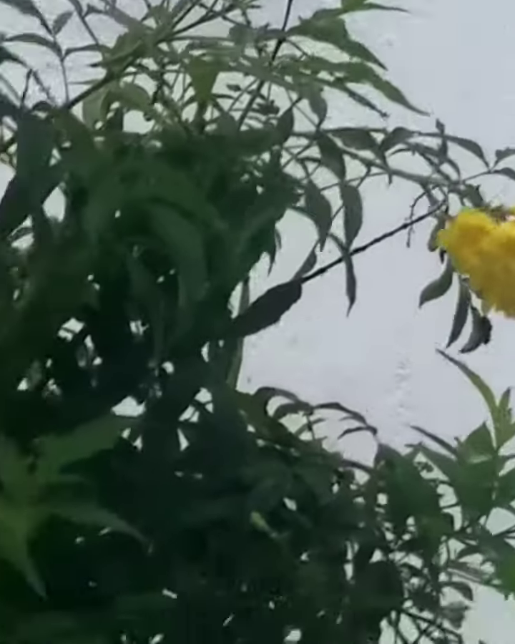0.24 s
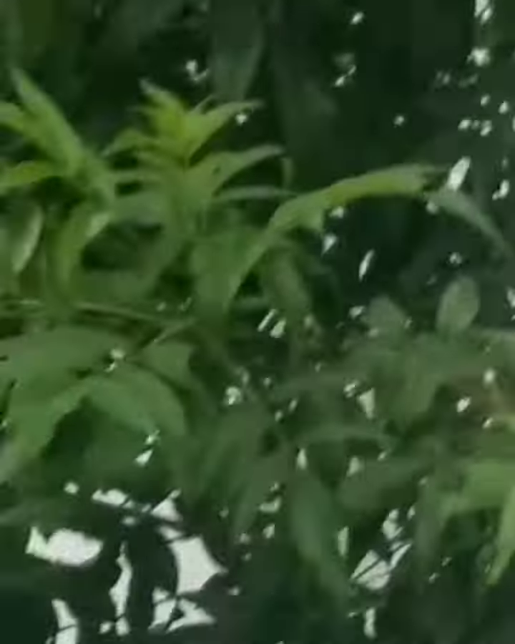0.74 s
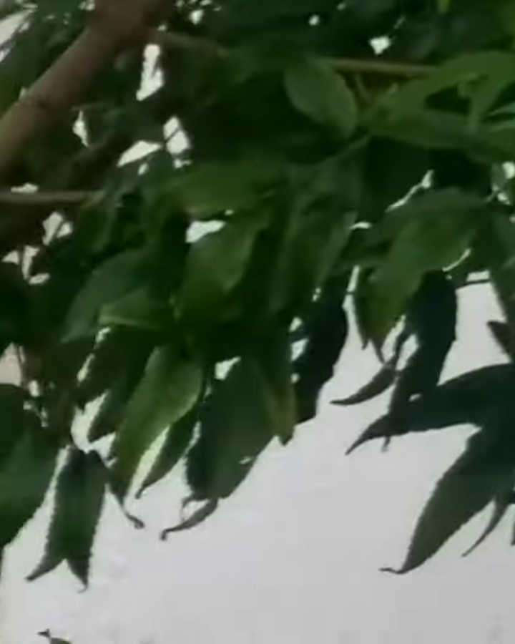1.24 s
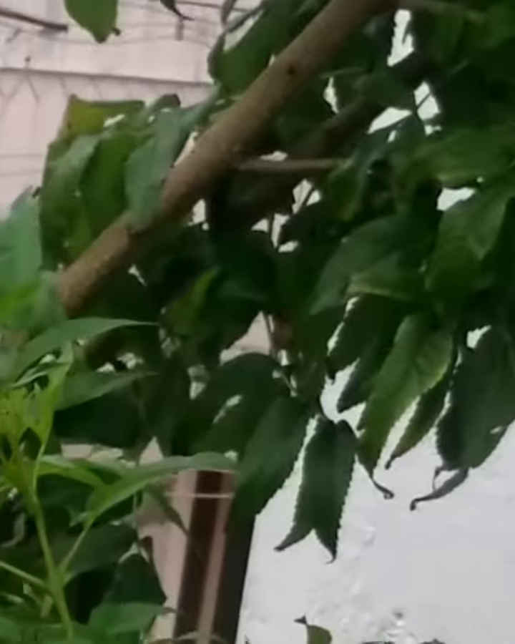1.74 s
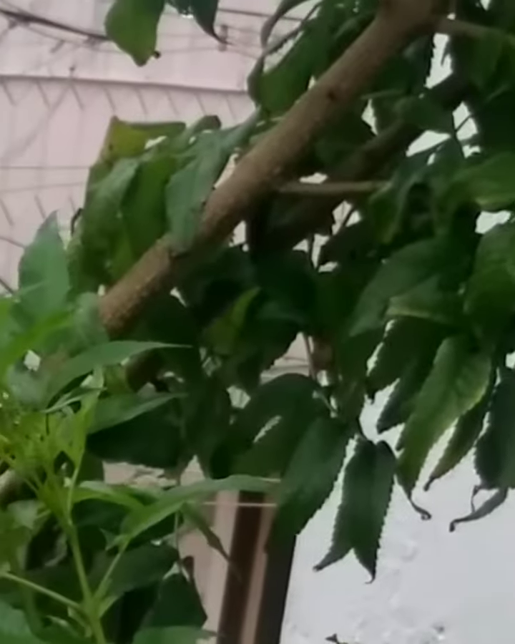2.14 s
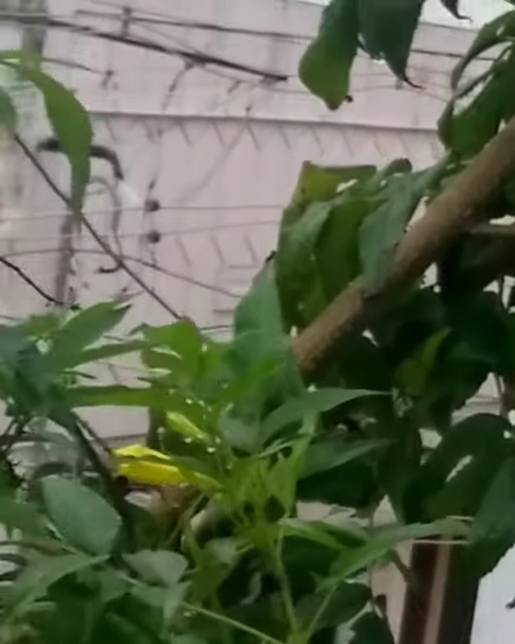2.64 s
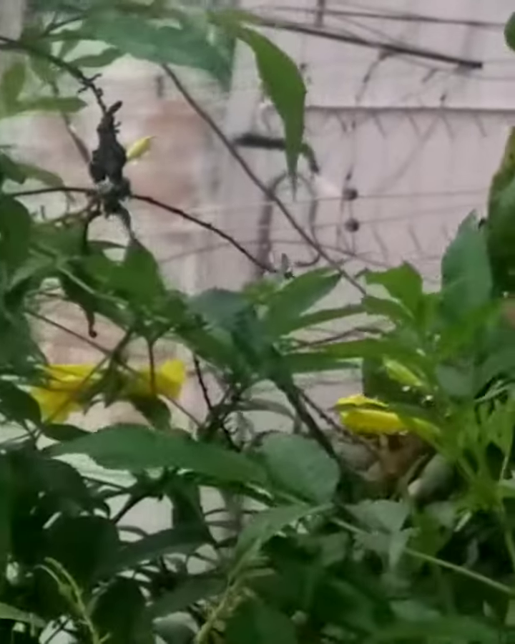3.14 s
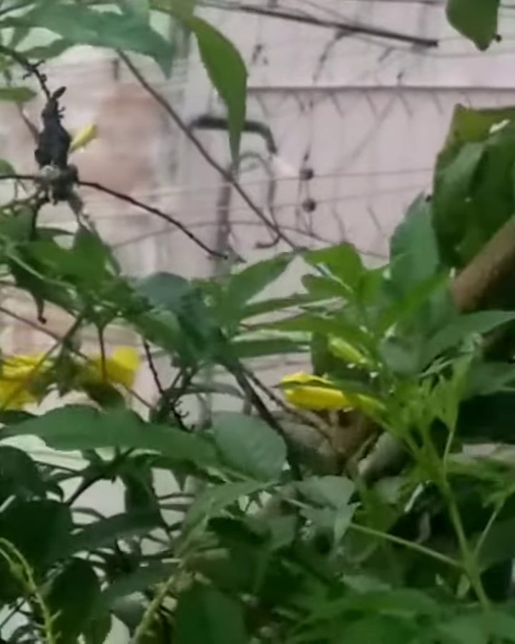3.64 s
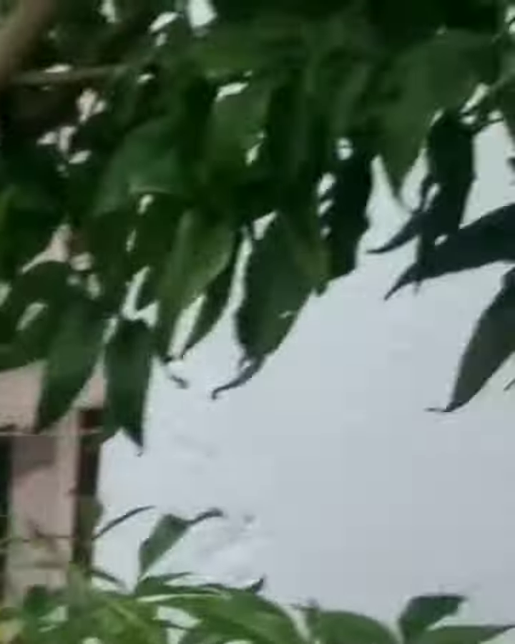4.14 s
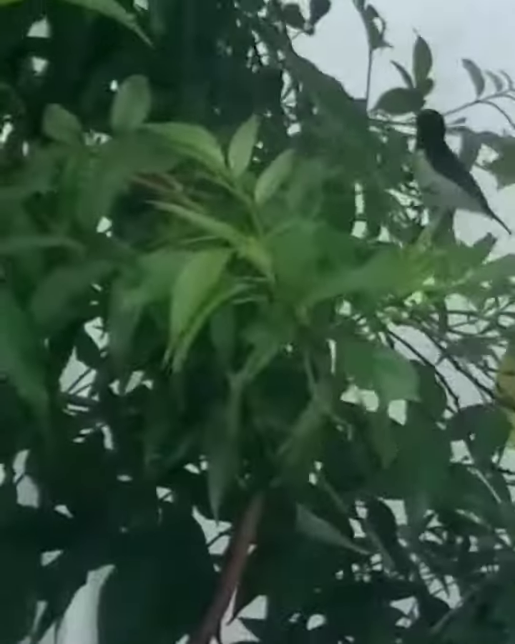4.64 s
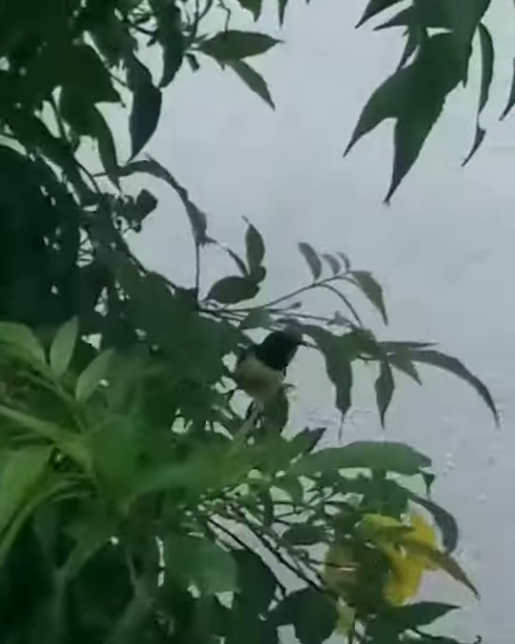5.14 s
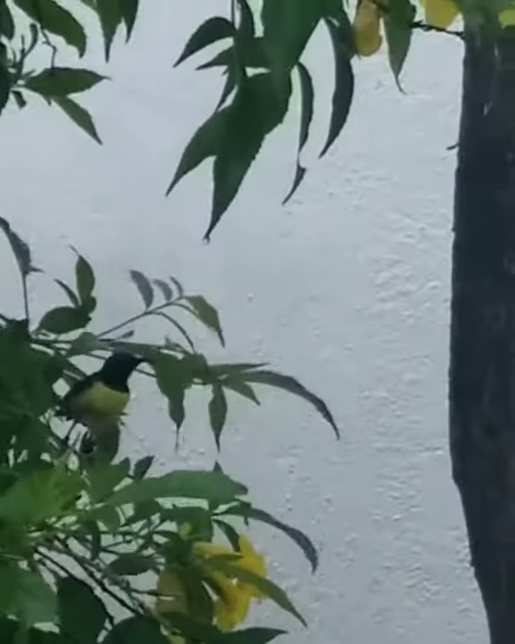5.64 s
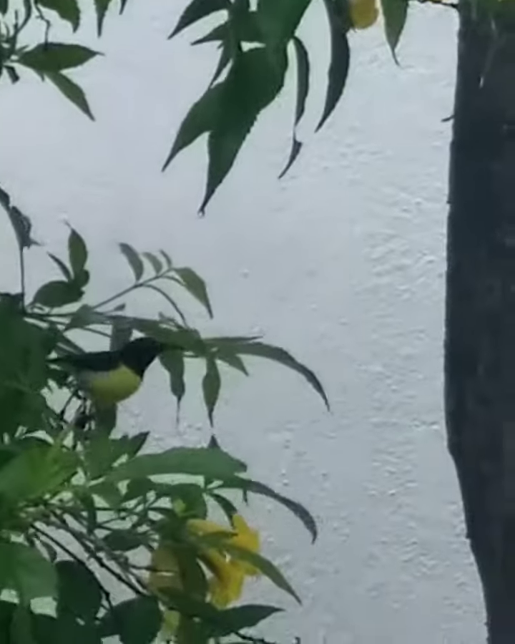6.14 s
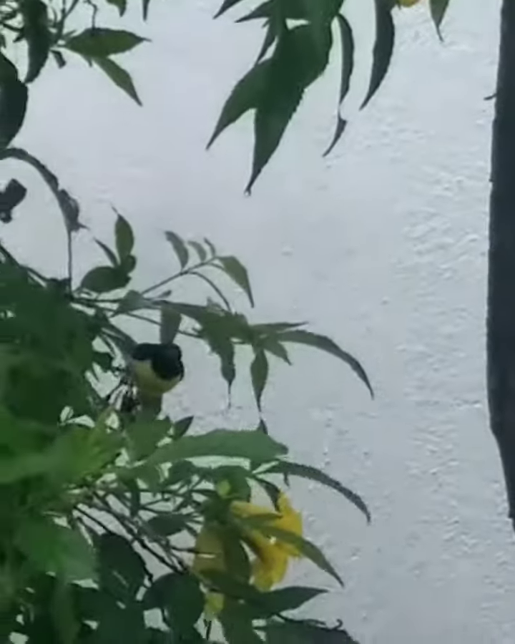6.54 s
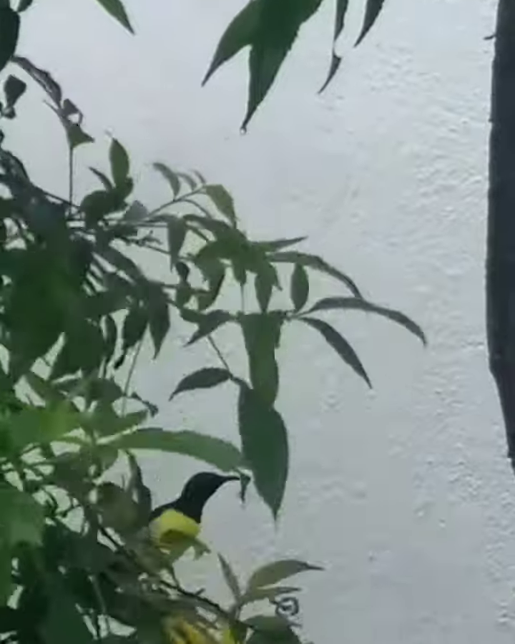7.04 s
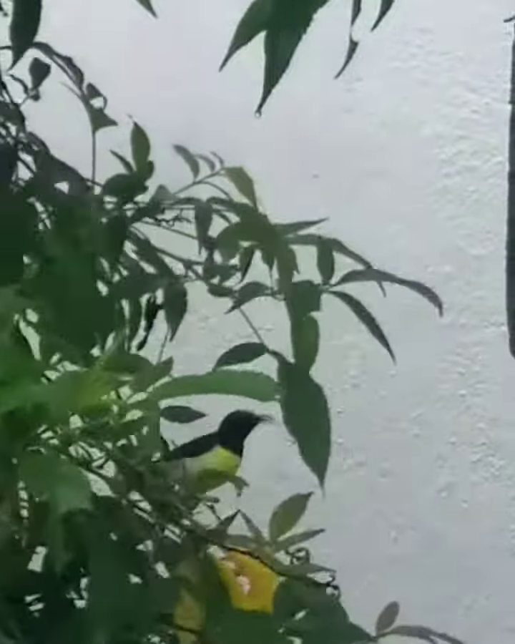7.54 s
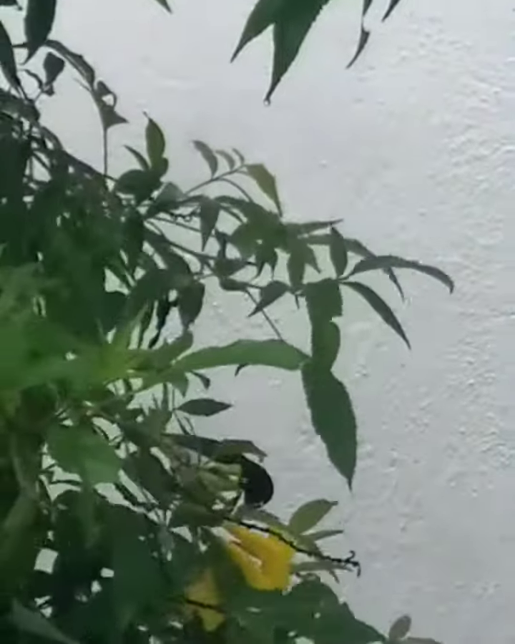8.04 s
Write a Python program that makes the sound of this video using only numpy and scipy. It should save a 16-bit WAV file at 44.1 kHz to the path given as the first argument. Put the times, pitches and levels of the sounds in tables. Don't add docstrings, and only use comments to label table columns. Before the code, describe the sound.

In a garden between walls, a sunbird gives one bright, rasp-edged chip, then after a pause a louder one, then a quick pair. A turbulent hiss of air spits close on the left, and two last chips ride over its fading end. Very faint crows and a town hum lie behind; the phone microphone's background swells around each loud sound.

```python
import sys
import numpy as np
from scipy import signal
from scipy.fft import rfft, irfft, next_fast_len
from scipy.io import wavfile
from scipy.ndimage import uniform_filter1d

SR = 44100
rng = np.random.default_rng(int(sys.argv[2]) if len(sys.argv) > 2 else 0)


def store_wav(level_fs):
    pcm = np.round(np.clip(np.atleast_2d(level_fs), -1, 1) * 32767)
    wavfile.write(sys.argv[1], SR, pcm.T.astype(np.int16))


def volts_from_db(level):
    exponent = np.asarray(level, float) / 20
    return 10 ** exponent


N = 366030
T = np.arange(N) / SR

# pitch top in seconds, level in dB, top pitch in Hz, resting pitch in Hz, length in seconds.
CHIPS = [
    (0.125, -18, 7134, 6100, .072),
    (3.012, -13.5, 7336, 6256, 0.068),
    (4.547, -16, 7380, 6230, 0.067),
    (4.75, -16.5, 7256, 6042, 0.056),
    (7.399, -15.5, 7450, 6014, 0.066),
    (7.717, -15.5, 7480, 6170, 0.063),
]
# left-right in dB, harsh onset in dB, echo in dB, pitch fall in seconds,
# lingering at the top (exponent).
STANCE = [(3, -13, -9.5, 0.062, 2.1), (-0.5, -19, -12.5, .018, 1.1), (-8.5, -14, -9.5, .016, 1.7),
          (-11, -10.5, -12, .018, 1.8), (-3, -10, -11.5, 0.021, 0.82), (-3.5, -10.5, -14.5, 0.023, 1.7)]
# frequency in Hz, level in dB.
RASP_TONE = [(3700, -59), (3950, -17), (4150, 0.5), (5000, -8), (6500, -2.5), (7800, -25), (8600, -35.5),
             (10600, -22.5), (12500, -32), (14500, -33.5), (15800, -47)]
# delay in seconds, left gain, right gain.
WALLS = [(.0052, 1, 0.51), (.0083, 0.24, 0.74), (0.0098, 0.31, -0.84), (.017, 0.21, 0.25),
         (0.025, 0.31, 0.45)]
# time in seconds, level in dB, left-right in dB.
JET = [
    (6.279, -95, 4.5),
    (6.435, -35.5, 12.5),
    (6.58, -32.5, 24.5),
    (6.79, -41.5, 20.5),
    (6.83, -47, 10),
    (7.03, -51.5, 8),
    (7.23, -66.5, 2.5),
    (7.95, -67, 3.5),
    (8.2, -99.5, -2),
]
# frequency in Hz, density in dB per Hz.
JET_TONE = [(1500, -35.5), (2400, -17.5), (3750, -17), (3900, -27), (4050, -2), (4480, 0), (6270, 1.5),
            (7420, 4), (8000, -5), (8390, -13), (10500, -10), (12300, -18), (15600, -29)]
# frequency in Hz, left-right in dB.
JET_TILT = [(2000, -8), (3900, -8), (4300, 0), (7900, 4), (8300, 24), (10000, 19), (15000, 12)]
# start in seconds, length in seconds, pitch in Hz, throat resonance in Hz, level in dB.
CAWS = [(1.072, 0.18, 520, 1030, -67.5), (1.146, 0.11, 417, 917, -71), (1.409, 0.21, 305, 1100, -65.5),
        (2.849, 0.2, 925, 1880, -75.5), (3.259, 0.28, 754, 1570, -67), (3.395, 0.24, 969, 1860, -71),
        (3.171, 0.23, 267, 270, -70.5), (5.05, .24, 582.5, 1150, -75.5), (5.482, 0.24, 210.2, 1000, -64.5),
        (5.819, 0.23, 293.5, 1160, -68), (6.613, 0.41, 734, 1590, -70.5), (7.34, 0.28, 569, 1090, -69.5)]
# time in seconds, pitch in Hz, level in dB.
INSECT = [
    (1.45, 4400, -76),
    (1.6, 4366, -67),
    (2.0, 4520, -70),
    (2.4, 4570, -67.5),
    (2.95, 4570, -74),
    (3.1, 4580, -97),
]
# start in seconds, pitch in Hz, level in dB.
TWEETS = [
    (1.749, 6580, -76),
    (2.11, 6180, -68),
]
# frequency in Hz, level in dB.
MOTORS = [(398, -83.5), (1955, -82.5), (2165, -81.5), (3330, -89.5), (6590, -83.5), (7230, -88),
          (7410, -92.5)]
# frequency in Hz, density in dB per Hz.
HUM_TONE = [(30, -42), (70, -21), (160, 0.5), (243, -9), (399, -9), (787, -9), (2130, -13), (2800, -13.5),
            (3800, -17.5), (4050, -14.5), (4500, -15.5), (7700, -20.5), (8200, -30.5), (15500, -53.5)]
# frequency in Hz, correlation.
HUM_SAME = [(60, 0.6), (300, 1), (700, 0.22), (1400, 0.21), (2500, 1), (4000, 0.57), (8000, 0.049)]
# frequency in Hz, left-right in dB.
HUM_TILT = [(60, -2), (110, -4.5), (200, 3), (380, 1.5), (700, 0), (1290, 2), (2380, 0.5), (4400, 0),
            (8120, 12.5), (15000, 1.5)]
# open time after the top in seconds, lift in dB, left-right in dB.
OPENS = [(0.1, 12, -4), (0.15, 10.5, -5), (0.33, 12.5, -2.5), (.17, 15, -5.5), (0.15, 12.5, -2),
         (0.11, 13, -2.5)]
# start in seconds, widest in seconds, lift in dB.
AWAKE = (5, 6.1, 5.7)
# frequency in Hz, floor in dB.
FLOOR_LOUDEST = [(7900, -89), (8300, -61), (11000, -63.5), (12500, -53.5), (16000, -53)]
# frequency in Hz, floor in dB.
FLOOR_LOW_MIDS = [(1800, -25), (2300, -9.5), (2800, -6), (3300, -3.5), (3550, -1), (3900, -1), (4000, -60)]
# frequency in Hz, share lost.
SPARSE = [(8000, 0), (8500, .12), (11000, .1), (12000, .3), (16000, .35)]

RASP_RISE_S, RASP_PEAK_S, RASP_DB_PER_S, RASP_TAIL_DB = 0.0075, -0.009, 1397, -27
RASP_WIDE_GAIN, RASP_BAND_HZ = 0.45, 1000
CAW_SAG = .98
HUM_DB, HUM_PATCHY_DB, STREAK_DB = -65.5, 1.5, 7
LEAD_S, FIRST_S, DIP_S, FULL_S, SHUT_S, SETTLE_S = 0.057, 0.021, 0.039, 0.096, 0.046, 0.26
FIRST_SHARE, DIP_SHARE, SHUT_SHARE = 0.9, .4, 0.22
REST_DB, WANDER_DB, CAW_LIFT_DB, CAW_HOLD_S = 0.21, 0.52, 2, 0.21
JET_WAKES_DB, JET_LIFT_DB_PER_DB, JET_LEAN_DB_PER_DB = -86.5, 0.28, 0.26
PORT_LAG_SAMPLES = 6


def evened(x):
    return x / np.sqrt(np.mean(x ** 2) + 1e-20)


def read(points, hz):
    f, value = np.transpose(points)
    return np.interp(np.log(hz + 1), np.log(f + 1), value)


def add(mix, start_s, sound):
    part = mix[..., round(start_s * SR):][..., :sound.shape[-1]]
    part += sound[..., :part.shape[-1]]


def sides(db):
    return volts_from_db(np.array([db / 2, -db / 2]))


def resonate(x, hz, width_hz):
    turn = np.exp(2j * np.pi * np.cumsum(hz * np.ones(len(x))) / SR)
    r = np.exp(-np.pi * width_hz / SR)
    return 2 * (turn * signal.lfilter([1 - r], [1, -r], x / turn)).real


def noise(tone, same, patchy_db, tilt=((1, 0), (2, 0))):
    frames, hz = N // 128 + 5, np.fft.rfftfreq(512, 1 / SR)
    a, b, c, d, patches = rng.standard_normal((frames, 257, 5)).T
    patches = uniform_filter1d(patches, size=5, axis=0)
    patches = evened(uniform_filter1d(patches, size=24, axis=1))
    same = np.clip(same(hz), -1, 1)[:, None]
    left = a + 1j * b
    z = np.array([left, same * left + np.sqrt(1 - same ** 2) * (c + 1j * d)])
    z *= volts_from_db(read(tone, hz)[:, None] + patchy_db * patches)
    z *= sides(read(tilt, hz))[..., None]
    return evened(signal.istft(z, nperseg=512, noverlap=384)[1][:, :N])


def yard(t60_s, size):
    taps = np.zeros((2, size))
    at = np.arange(300, size - 20, 20) + rng.integers(0, 20, (2, (size - 301) // 20))
    np.put_along_axis(taps, at, rng.choice([-1., 1.], at.shape), 1)
    taps *= volts_from_db(-60 * np.arange(size) / SR / t60_s)
    return taps / np.linalg.norm(taps[0])


def chip(db, top_hz, rest_hz, length_s, fall_s, linger, rasp_db, rasp):
    t = np.arange(-.04, length_s + 0.06, 1 / SR)
    slide_hz = rest_hz + (top_hz - rest_hz) * np.exp(-(np.abs(t) / fall_s) ** linger)
    hz = np.where(t < 0, top_hz + 150000 * t, slide_hz)
    hz = uniform_filter1d(np.maximum(hz, 4200), size=260)
    shaky = evened(uniform_filter1d(rng.standard_normal(len(t)), size=30))
    shake_hz = shaky * (30 + 260 * np.clip(-t / .01, 0, 1))
    turns = 2 * np.pi * np.cumsum(hz + shake_hz) / SR

    swell_db = np.interp(t, [-.04, -.02, -.008, .006, 0.99 * length_s, length_s, length_s + 0.0082],
                         [-63.5, -22.5, -17.0, -4.0, -1.5, 0.0, -42.5])
    overtone = volts_from_db(-38) * (0.6 + shaky) * np.clip((hz - 5600) / 1200, .3, 1) * np.sin(2 * turns)
    whistle = volts_from_db(swell_db) * np.sqrt(2) * (np.sin(turns) + overtone)
    whistle *= 1 + 0.021 * evened(resonate(shaky, 920, 160))

    after_s = t - RASP_PEAK_S
    rise_db = 4 - 6 * (after_s / RASP_RISE_S) ** 2
    die_db = np.maximum(4 - RASP_DB_PER_S * after_s, RASP_TAIL_DB - 300 * t)
    puff = volts_from_db(rasp_db + np.where(after_s < 0, rise_db, die_db))
    rasp = rasp[:len(t)]
    rasp = RASP_WIDE_GAIN * rasp + evened(resonate(rasp, hz, RASP_BAND_HZ))
    return volts_from_db(db) * (whistle + puff * rasp) * np.clip((t + 0.047) / .012, 0, 1)


def sunbird(gate):
    tone = volts_from_db(read(RASP_TONE, np.fft.rfftfreq(N, 1 / SR)))
    rasp = evened(irfft(rfft(rng.standard_normal(N)) * tone))
    low_cut = signal.cheby2(6, 34, 3550, "high", fs=SR, output="sos")
    near, far = np.zeros((2, 2, N))
    for k, ((s, *voice), (pan_db, rasp_db, echo_db, fall_s, linger)) in enumerate(zip(CHIPS, STANCE)):
        call = chip(*voice, fall_s, linger, rasp_db, rasp[k * SR:])
        call = signal.sosfilt(low_cut, call)
        add(near, s - .04, sides(pan_db)[:, None] * call)
        for (delay_s, *gain), shift in zip(WALLS, rng.uniform(.85, 1.15, 5)):
            add(near, s - .04 + delay_s * shift, np.outer(gain, call))
        add(far, s - .04, volts_from_db(echo_db) * signal.fftconvolve(call[None], yard(.46, size=30000), axes=1))
    far = signal.sosfilt(signal.butter(4, 8200, fs=SR, output="sos"), far)
    return near + volts_from_db(-10.5) * far * gate ** 1.2


def jet():
    s, db, pan_db = np.transpose(JET)
    spits = volts_from_db(2.0 * evened(uniform_filter1d(rng.standard_normal(N), size=60)))
    hiss = noise(JET_TONE, lambda hz: .2 + 0 * hz, 1.2, JET_TILT) * spits
    hiss[1] = np.roll(hiss[1], 2 * PORT_LAG_SAMPLES)
    pan_db = np.interp(T, s, pan_db)
    return hiss * volts_from_db(np.interp(T, s, db, -150, -150) + 10) * [np.ones(N), volts_from_db(-pan_db)]


def crows():
    out = np.zeros(N)
    for s, length_s, hz, throat_hz, db in CAWS:
        u = np.linspace(0, 1, round(length_s * SR))
        wobble = evened(uniform_filter1d(rng.standard_normal(len(u)), size=400))
        turns = np.cumsum(hz * (1 + (CAW_SAG - 1) * u) + .028 * hz * wobble) / SR
        folds = sum(np.cos(2 * np.pi * k * turns) for k in range(1, 8))
        folds = folds * (1 + .4 * wobble[::-1]) + 500 / hz * rng.standard_normal(len(u))
        caw = resonate(resonate(folds, throat_hz, 460), throat_hz, 460)
        caw += .2 * resonate(folds, 2 * throat_hz, 300)
        caw += .45 * (700 < hz < 800) * resonate(folds, hz, 150)
        add(out, s, volts_from_db(db) * evened(caw) * signal.windows.tukey(len(u), .3) * (1.2 - 0.49 * u))
    echo = signal.fftconvolve(out[None], yard(0.17, size=16000), axes=1)[:, :N]
    return 0.77 * out + 0.85 * echo


def insect(white):
    s, hz, db = np.transpose(INSECT)
    hz = np.interp(T, s, hz)
    whistle = evened(resonate(resonate(white, hz, 170), hz, 170))
    return volts_from_db(np.interp(T, s, db, -150, -150)) * whistle


def far_tweets(white):
    out = np.zeros(N)
    t = np.arange(0, .15, 1 / SR)
    for s, hz, db in TWEETS:
        tweet = evened(resonate(white[:len(t)], hz, 90.4))
        add(out, s, volts_from_db(db - 95 * t) * np.minimum(t / 0.021, 1) * tweet)
    return out


def motors(white):
    return sum(volts_from_db(db) * evened(resonate(resonate(white, hz, 16), hz, 16)) for hz, db in MOTORS)


def small_voices():
    white = rng.standard_normal(N)
    return motors(white) + insect(white[::-1]) + far_tweets(white)


def streaked(x):
    hz, t, z = signal.stft(x, SR, nperseg=2048)
    drift = rng.standard_normal(z.shape[1:])
    drift = evened(uniform_filter1d(drift, size=14, axis=1, mode="wrap"))
    treble = ((hz > 4000) & (hz < 8000))[:, None]
    z *= volts_from_db(STREAK_DB * np.clip(2 * drift - 2, 0, 1) * treble)
    return signal.istft(z, SR, nperseg=2048)[1][:, :N]


def town_hum():
    hum = noise(HUM_TONE, lambda hz: read(HUM_SAME, hz), HUM_PATCHY_DB, HUM_TILT)
    return volts_from_db(HUM_DB) * streaked(hum)


def noise_gate():
    s, db, pan_db = np.transpose(JET)
    lift_db = JET_LIFT_DB_PER_DB * np.maximum(np.interp(T, s, db) - JET_WAKES_DB, 0)
    lean_db = JET_LEAN_DB_PER_DB * np.interp(T, s, pan_db, 0, 0) * np.minimum(lift_db / 5, 1)
    cawing = sum((T > s) & (T < s + length_s + CAW_HOLD_S) for s, length_s, *_ in CAWS) > 0
    lift_db = np.maximum(lift_db, CAW_LIFT_DB * uniform_filter1d(cawing * 1., size=4000))
    lift_db = np.maximum(lift_db, np.interp(T, [*AWAKE[:2], JET[0][0]], [0, AWAKE[2], 0]))
    for (s, *_), (hold_s, db, pan_db) in zip(CHIPS, OPENS):
        hold_s = max(hold_s, FULL_S + .001)
        share = np.interp(T - s,
                          [-LEAD_S, FIRST_S, DIP_S, FULL_S, hold_s, hold_s + SHUT_S, hold_s + SETTLE_S],
                          [0, FIRST_SHARE, DIP_SHARE, 1, 1, SHUT_SHARE, 0])
        lift_db = np.maximum(lift_db, db * share)
        lean_db = lean_db + pan_db * share
    wander = [evened(uniform_filter1d(row, size=2500)) for row in rng.standard_normal((2, N))]
    return volts_from_db(REST_DB + lift_db + WANDER_DB * wander[0]) * sides(lean_db + WANDER_DB * wander[1])


def scene():
    gate = noise_gate()
    return sunbird(gate) + jet() + gate * (town_hum() + crows() + small_voices())


def limiter(x, ceiling_db):
    envelope = uniform_filter1d(abs(signal.hilbert(x, next_fast_len(N)))[:, :N], size=60)
    return x / np.maximum(envelope / volts_from_db(ceiling_db), 1) ** .7


def drop_weak_bands(x):
    hz, t, z = signal.stft(np.array([x[0] + x[1], x[0] - x[1]]) / 2, SR, nperseg=1024, noverlap=512)
    bands, hz = z[:, :512].reshape(2, 128, 4, -1), hz[2:512:4]
    band_db = 10 * np.log10((abs(bands) ** 2).sum(axis=2, keepdims=True) + 1e-14)

    base_db = band_db[:, 4:24].mean(axis=1, keepdims=True)
    bright_db = uniform_filter1d(band_db[:, 100:130].mean(axis=1, keepdims=True), size=9, axis=3)
    low_db = read(FLOOR_LOW_MIDS, hz)[:, None, None] + base_db
    low_db = low_db - 20 * (bright_db > -77)
    low_db[1] -= 8
    loudest_db = band_db.max(axis=(0, 1), keepdims=True)
    high_db = read(FLOOR_LOUDEST, hz)[:, None, None] + 0.88 * loudest_db

    luck = rng.standard_normal(band_db.shape)
    slow = evened(uniform_filter1d(luck, size=8, axis=3))
    steady_db = uniform_filter1d(uniform_filter1d(band_db, size=7, axis=3), size=3, axis=1)
    kept = steady_db > uniform_filter1d(low_db, size=3, axis=3) + 2.2 * slow - .8
    kept &= band_db > high_db + 1.5 * slow
    kept &= 1 / (1 + np.exp(-1.7 * slow[:1])) > read(SPARSE, hz)[:, None, None]
    z[:, :512] = (bands * kept).reshape(2, 512, -1)
    mid, side = signal.istft(z, SR, nperseg=1024, noverlap=512)[1][:, :N]
    return np.array([mid + side, mid - side])


def low_pass(x):
    return signal.sosfilt(signal.butter(12, 15810, fs=SR, output="sos"), x)


def record(dry):
    late = np.array([np.roll(dry[0], PORT_LAG_SAMPLES), dry[1]])
    thin = signal.sosfilt(signal.butter(2, 70, "high", fs=SR, output="sos"), late)
    mix = drop_weak_bands(limiter(thin, -6.0))
    return low_pass(mix)


dry = scene()
out = record(dry)
store_wav(out)
```